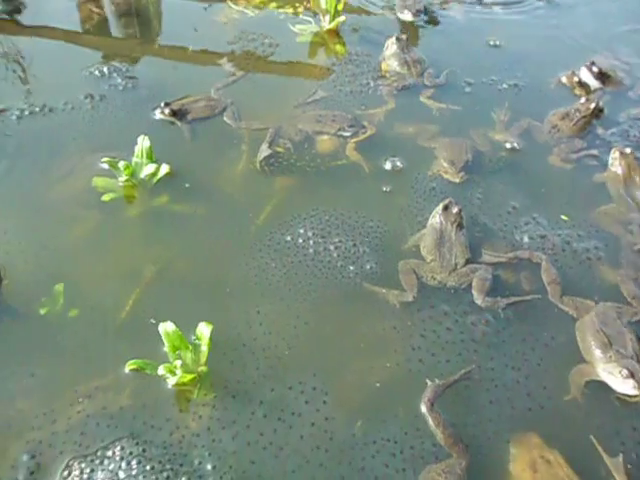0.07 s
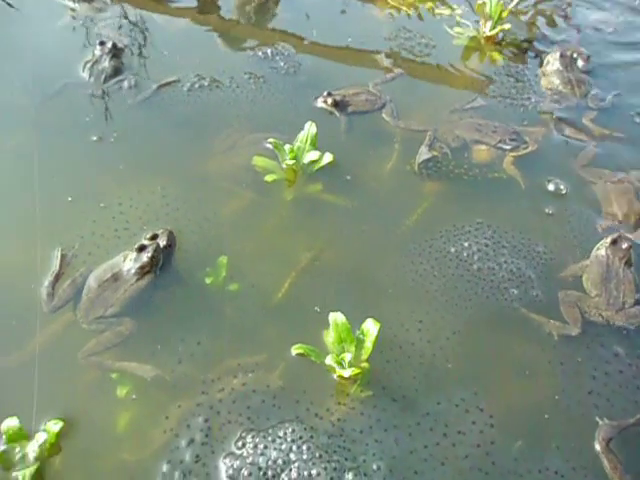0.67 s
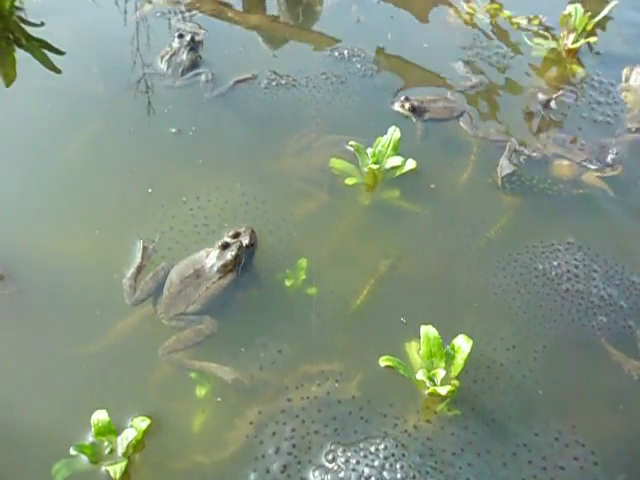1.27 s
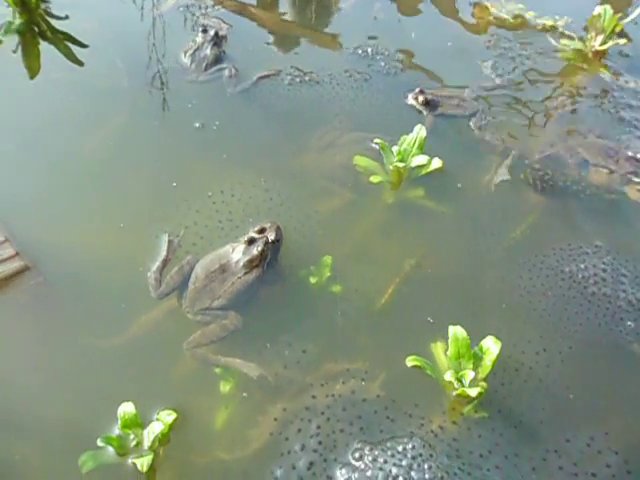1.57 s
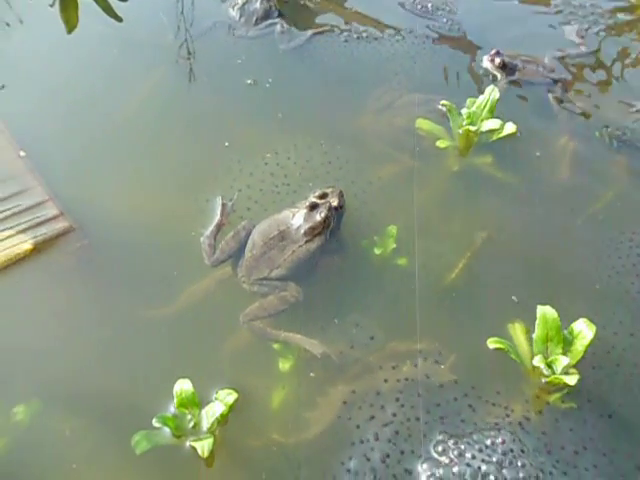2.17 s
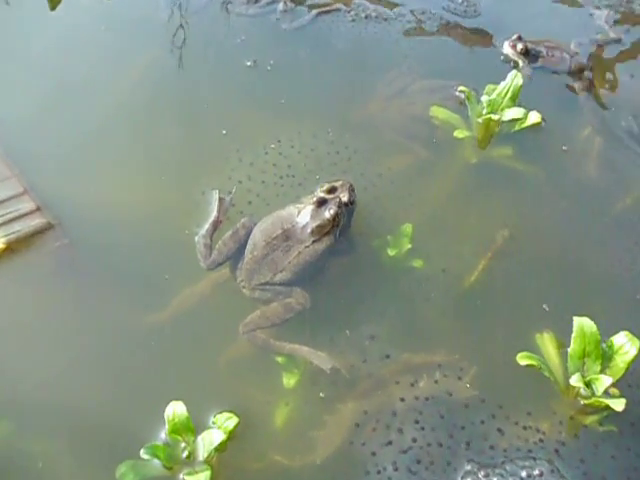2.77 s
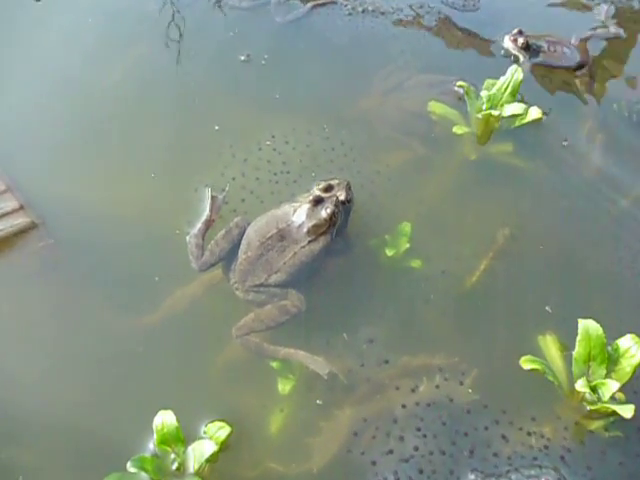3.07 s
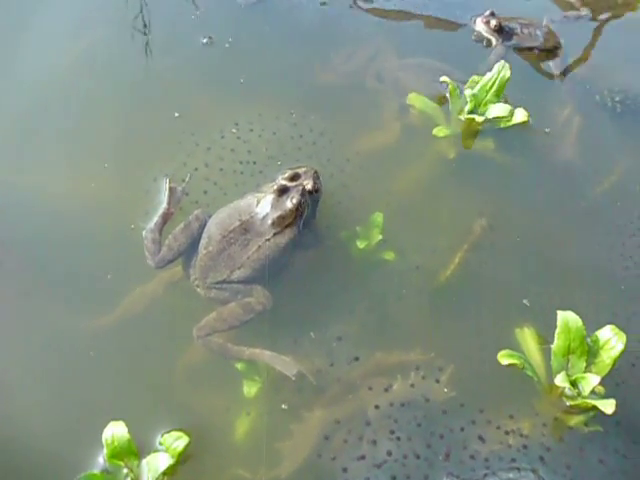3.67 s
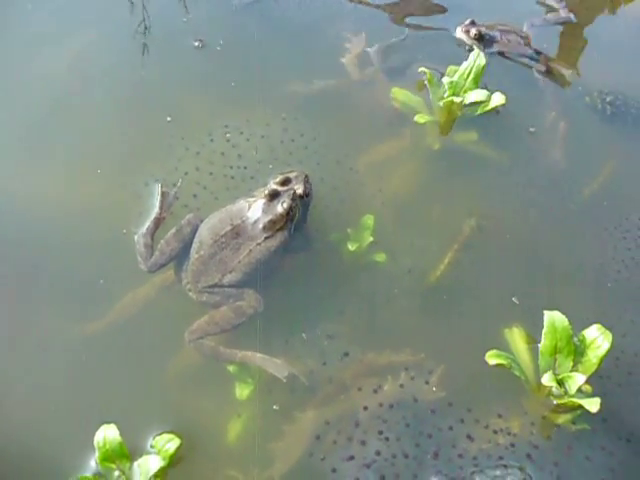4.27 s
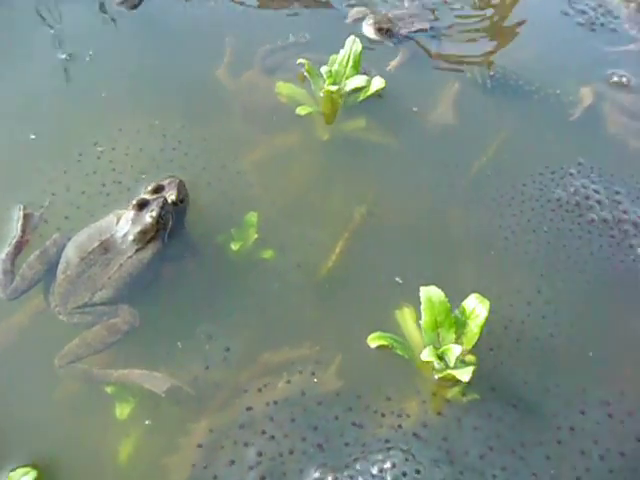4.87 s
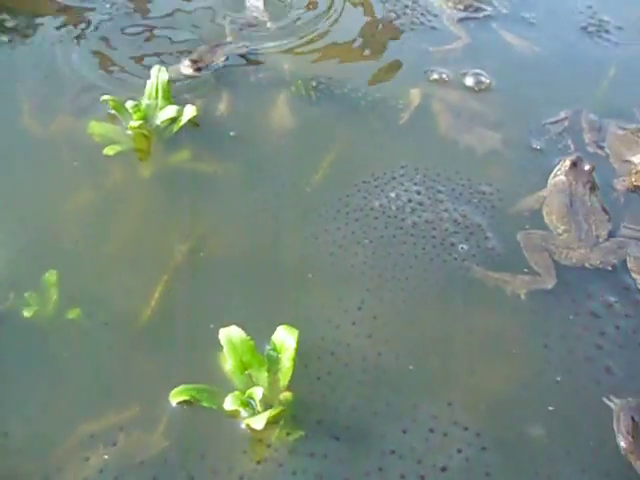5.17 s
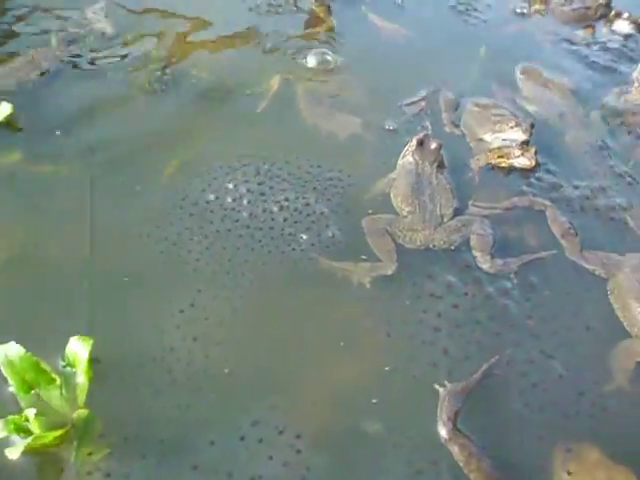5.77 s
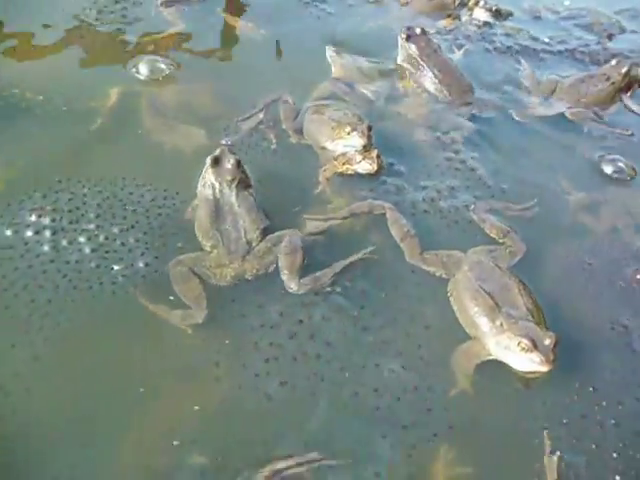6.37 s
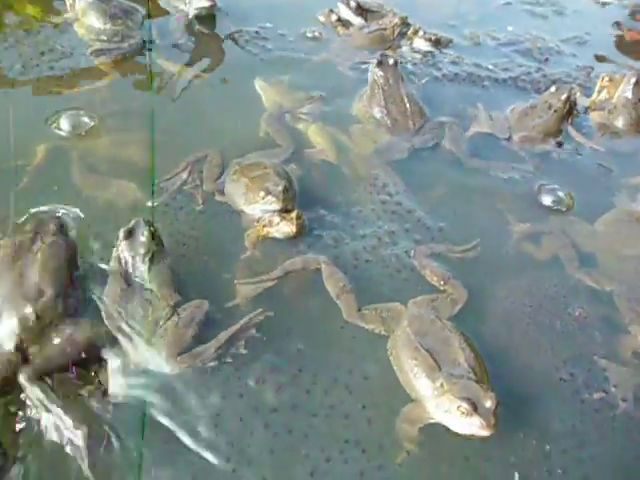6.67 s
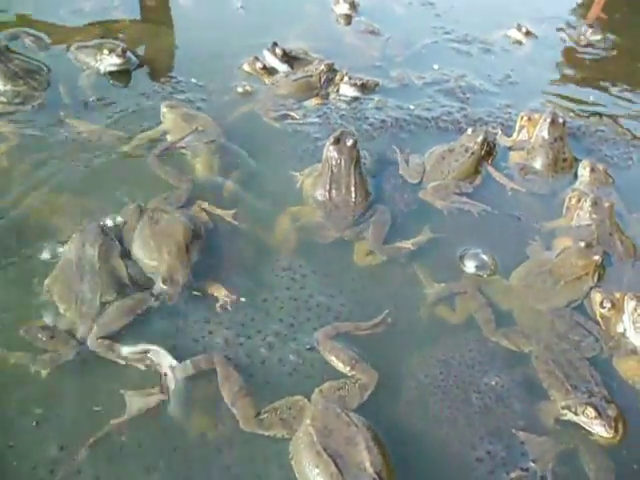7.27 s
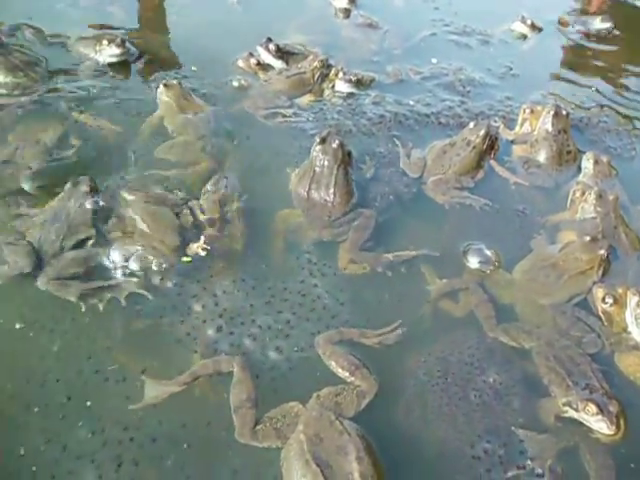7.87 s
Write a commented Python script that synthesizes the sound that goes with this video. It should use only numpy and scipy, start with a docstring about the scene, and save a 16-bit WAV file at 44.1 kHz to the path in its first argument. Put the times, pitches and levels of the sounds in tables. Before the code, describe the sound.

Purring, throaty croaks run almost without pause, picked up by a small camera microphone beside a garden pond. A dull knock on wood comes at the start, then a loud hollow one and two lesser ones around the middle. Toward the end the frogs move in the water with small splashes, drips and plinking bubbles. Behind them are a far frog chorus, soft hiss, faint bird whistles and, twice, a quiet zoom motor.

```python
"""A garden pond where common frogs purr: each croak is a train of pulses that ring the caller's throat sac.
Four hollow wooden knocks sound close by; swimming frogs slosh, splash and stir up bubbles.
Under it lie a far chorus, a faint bird, a low rumble, a swelling hiss
and, twice, the soft whirr of a zoom lens."""
import sys
import numpy as np
from scipy import signal
from scipy.fft import rfft, irfft
from scipy.io import wavfile

SR = 44100
rng = np.random.default_rng(int(sys.argv[2]) if len(sys.argv) > 2 else 0)


def store_pcm(level_fs):
    """Save levels as 16-bit WAV."""
    pcm = np.round(np.clip(level_fs, -1, 1) * 32767).astype(np.int16)
    wavfile.write(sys.argv[1], SR, np.atleast_2d(pcm).T)


N = 348831
TIME = np.arange(N) / SR


def from_db(db):
    """Decibels to gain."""
    return 10 ** (np.asarray(db) / 20)


def unit_rms(x):
    """Scale to unit power."""
    return x / np.sqrt(np.mean(x ** 2) + 1e-20)


def automation(points):
    """Join (time [s], value) breakpoints by straight lines."""
    return np.interp(TIME, *np.transpose(points))


def add(track, s, sound):
    """Mix a sound into the track at time s."""
    start = int(np.clip(round(s * SR), 0, N - 1))
    track[start:start + len(sound)] += sound[:N - start]


def shaped_noise(eq):
    """Unit-power noise through an EQ curve of (frequency [Hz], relative level [dB]) points."""
    hz, db = np.transpose(eq)
    bins = np.fft.rfftfreq(N, 1 / SR) + 1e-3
    gain = from_db(np.interp(np.log(bins), np.log(hz), db))
    return unit_rms(irfft(rfft(rng.normal(size=N)) * gain, N))


def filtered(x, hz, kind, order=2):
    """Causal Butterworth filter."""
    sos = signal.butter(order, np.clip(hz, 10, .45 * SR), kind, fs=SR, output="sos")
    return signal.sosfilt(sos, x)


def decay(t, t60):
    """Free decay, 60 dB down after t60 seconds."""
    return np.exp(-np.log(1000) * t / max(t60, 1e-4))


def ring(t, hz, t60):
    """One struck mode."""
    return np.sin(2 * np.pi * hz * t) * decay(t, t60)


def struck(t, modes, scale=1, spread_db=1):
    """Modes of alternating sign, each struck a little harder or softer by chance."""
    return sum((-1) ** k * from_db(db + spread_db * rng.normal()) * ring(t, hz * scale, t60)
               for k, (hz, db, t60) in enumerate(modes))


# tone of the outdoor air: (frequency [Hz], relative level [dB])
AIR_EQ = [(20, 1.5), (48, -3.5), (80, -11.5), (140, -14), (290, -29.5), (450, -27.5), (800, -29.5),
          (1800, -41), (3500, -44.5), (7000, -66.5)]
# fader ride on the low end, taken about its mean: (time [s], level [dB])
RUMBLE_RIDE = [(0.0, -52), (0.11, -54), (2.73, -51), (2.82, -58), (2.99, -43.5), (3.21, -52), (7.9, -54.5)]


def outdoor_air(level_db=-47, ride_depth=0.94, rumble_below_hz=110):
    """A dark bed of air whose low rumble rises and sinks."""
    air = from_db(level_db) * shaped_noise(AIR_EQ)
    ride_db = automation(RUMBLE_RIDE)
    rumble_gain = from_db(ride_depth * (ride_db - ride_db.mean()))
    return air + (rumble_gain - 1) * filtered(air, rumble_below_hz, "low", order=1)


# tone of the steady hiss and of its swells: (frequency [Hz], relative level [dB])
HISS_EQ = [(1500, -5.5), (2800, 0), (4500, 7), (7500, 2), (9000, -34)]
SWELL_EQ = [(1500, -12.5), (3000, -8.5), (4500, -2), (7400, -5), (9000, -20)]
# crests of the swells: (time [s])
SWELL_TIMES = [0.30, 0.90, 1.35, 2.40, 2.91, 3.469, 4.02, 4.68]


def hiss(steady_db=-70, swell_db=-62.5, swell_s=0.086):
    """A soft hiss that swells about twice a second early on, then lies still."""
    steady = from_db(steady_db) * shaped_noise(HISS_EQ)
    swells = sum(np.exp(-((TIME - s) / swell_s) ** 2) for s in SWELL_TIMES)
    return steady + from_db(swell_db) * swells * shaped_noise(SWELL_EQ)


# fader ride on the distant frogs: (time [s], level [dB])
CHORUS_RIDE = [(0.1, -53), (0.6, -61.5), (1.15, -67.5), (1.5, -51.5), (2.7, -51.5), (3.8, -63), (4.4, -50),
               (5.2, -59), (6.2, -61.5), (7.1, -56.5), (7.8, -69.5)]


def far_frogs(pulses_per_s=130, sac_hz=495, spread_db=4):
    """Many distant callers overlap into a dull, irregular patter."""
    out = np.zeros(N)
    for s in TIME[rng.random(N) < pulses_per_s / SR]:
        gain = from_db(spread_db * rng.normal())
        caller_hz = sac_hz * np.exp(0.13 * rng.normal())
        add(out, s, gain * croak_pulse(caller_hz, rasp_db=-19.5))
    return from_db(automation(CHORUS_RIDE)) * unit_rms(out)


# bird whistles: (time [s], length [s], start pitch [Hz], end pitch [Hz], level [dB])
CHIRPS = [(2.796, 0.11, 4240, 3380, -54), (3.125, 0.029, 5060, 4830, -59.5),
          (3.348, 0.021, 5300, 5160, -59.5), (3.761, 0.0378, 5080, 4700, -62),
          (3.883, 0.044, 5100, 4930, -63)]


def far_bird(blur=0.061):
    """Thin falling whistles, their pitch blurred by distance."""
    out = np.zeros(N)
    for s, length, start_hz, end_hz, db in CHIRPS:
        size = int(length * SR)
        jitter = unit_rms(filtered(rng.normal(size=size), 300, "low"))
        hz = np.linspace(start_hz, end_hz, size) * (1 + blur * jitter)
        whistle = np.sin(2 * np.pi * np.cumsum(hz) / SR)
        add(out, s, from_db(db) * np.hanning(size) ** .5 * whistle)
    return out


# runs of the lens motor: (start [s], end [s], level [dB])
ZOOMS = [(1.704, 2.624, -61.5), (4.85, 5.536, -64.5)]
# tone of its whirr: (frequency [Hz], relative level [dB])
WHIRR_EQ = [(1500, -8), (2900, -3.5), (3500, -16), (4250, 1), (4900, -5), (5600, -2), (7500, -13.5)]


def zoom_lens(ramp_s=0.083):
    """A tiny motor whirrs through the camera body."""
    running = sum(from_db(db) * np.clip(np.minimum(TIME - start, end - TIME) / ramp_s, 0, 1)
                  for start, end, db in ZOOMS)
    return running * shaped_noise(WHIRR_EQ)


def ripples(ticks_per_s=35, level_db=-55, rise_per_s=25):
    """Small bubbles all over the pond ring as faint rising ticks."""
    out, t = np.zeros(N), TIME[:SR // 50]
    for s in TIME[rng.random(N) < ticks_per_s / SR]:
        gain = from_db(level_db + 2 * rng.normal())
        add(out, s, gain * ring(t * (1 + rise_per_s * t), hz=rng.uniform(2000, 7000), t60=.004))
    return out


# tiny bubbles bursting: (time [s], level before trim [dB])
BURSTS = [(3.1817, -46.5), (3.2415, -47), (5.676, -47), (5.7748, -49), (6.4817, -39), (6.7386, -41),
          (7.1821, -45.5), (7.8012, -42)]


def bursting_bubbles(trim_db=-1.5, t60=.012, low_cut_hz=2800):
    """A bubble film breaks: a brief bright click with no pitch."""
    out, t = np.zeros(N), TIME[:SR // 40]
    for s, db in BURSTS:
        click = rng.normal(size=len(t)) * decay(t, t60)
        add(out, s, from_db(db + trim_db) * filtered(click, low_cut_hz, "high"))
    return out


def churn(strokes, low_hz, high_hz, bubbles_per_s, cycles, tail_s, tilt_db):
    """Each stroke breaks the surface into many bubbles of random size, each ringing for a few cycles."""
    out, t = np.zeros(N), TIME[:SR // 5]
    for s, length, db in strokes:
        cloud = np.zeros(len(t))
        for onset, pitch, strength in rng.random((int(bubbles_per_s * t[-1]), 3)):
            start = int(onset * len(t))
            hz = low_hz * (high_hz / low_hz) ** pitch
            age = t[:min(int(SR * cycles / hz), len(t) - start)]
            gain = from_db(10 * strength + tilt_db * pitch)
            cloud[start:start + len(age)] += gain * ring(age, hz, cycles / hz)
        attack = 1 - np.exp(-4 * t / length)
        release = np.exp(-np.maximum(t - length, 0) / tail_s)
        add(out, s, from_db(db) * attack * release * unit_rms(cloud))
    return out


# swimming strokes: (time [s], length [s], level [dB])
SLOSHES = [(5.865, 0.019, -38.5), (6.805, 0.11, -47.5), (6.920, 0.06, -47), (7.420, 0.047, -45)]


def slosh():
    """A swimming frog shoves water aside, and large bubbles ring low."""
    return churn(SLOSHES, low_hz=99, high_hz=1370, bubbles_per_s=1100,
                 cycles=18, tail_s=0.022, tilt_db=0.5)


# kicks at the surface: (time [s], length [s], level [dB])
KICKS = [(0.911, 0.0064, -55.5), (5.952, 0.025, -44.5), (6.773, 0.0039, -41.5), (6.815, .014, -50.5),
         (6.945, 0.0059, -49), (7.057, .014, -48.5), (7.095, 0.025, -48), (7.677, .013, -52)]


def splashes(fall_delay_s=.044, fall_db=-9, drops_db=-12.5):
    """A kick throws bright spray, which falls back more softly while stray drops patter down."""
    falls = [(s + fall_delay_s, length, db + fall_db) for s, length, db in KICKS]
    spray = churn(list(KICKS) + falls, low_hz=1240, high_hz=8730, bubbles_per_s=3000,
                  cycles=28, tail_s=0.0078, tilt_db=30.5)
    drops = churn(KICKS, low_hz=2550, high_hz=7300, bubbles_per_s=70, cycles=15, tail_s=0.07, tilt_db=0)
    return spray + from_db(drops_db) * drops


# bubble trails behind a moving frog: (start [s], end [s], bubbles [count],
# start level [dB], end level [dB], start pitch [Hz], end pitch [Hz])
TRAILS = [ (0.231, 0.292, 3, -46, -43.5, 3100, 3560), (5.361, 5.412, 5, -39, -40, 2400, 2800),
          (5.430, 5.455, 3, -43, -42, 1920, 2350), (6.766, 6.827, 4, -31.5, -40.5, 3020, 1680),
          (6.958, 6.998, 3, -49.5, -28, 2170, 2760), (7.528, 7.597, 6, -42, -42, 1100, 2580), ]
# single drips: (time [s], level [dB], pitch [Hz])
DRIPS = [(2.498, -38, 6800), (2.806, -38.5, 4100), (3.312, -46.5, 3250), (5.967, -34, 2880),
         (6.702, -29, 6100), (6.781, -31, 4730), (6.933, -37.5, 6700), (7.684, -40.5, 4790)]


def bubbles(rise_per_s=7.2, cycles=45.4, snap_db=-9, pitch_scatter=0.061):
    """A bubble pinches off with a snap and rings, rising in pitch; size and level drift along a trail."""
    out, t = np.zeros(N), TIME[:SR // 25]
    trail_bubbles = []
    for start, end, count, start_db, end_db, start_hz, end_hz in TRAILS:
        trail = np.linspace((start, start_db, start_hz), (end, end_db, end_hz), int(round(count)))
        trail_bubbles += [(s, db, hz * np.exp(pitch_scatter * rng.normal())) for s, db, hz in trail]
    for s, db, hz in trail_bubbles + list(DRIPS):
        snap = from_db(snap_db) * rng.normal(size=len(t)) * decay(t, t60=0.0013)
        plink = ring(t * (1 + rise_per_s * t), hz, t60=cycles / hz)
        add(out, s, from_db(db) * (plink + snap))
    return out


def fizz(relative_db=-23):
    """Finer bubbles sparkle around each trail, tucked under its mean level."""
    strokes = [(start, end - start, (start_db + end_db) / 2 + relative_db)
               for start, end, _, start_db, end_db, *_ in TRAILS]
    return churn(strokes, low_hz=1250, high_hz=3580, bubbles_per_s=290,
                 cycles=4.7, tail_s=0.028, tilt_db=7.5)


# modes of the hollow wood: (frequency [Hz], relative level [dB], t60 [s])
WOOD_MODES = [(137, -15, 0.4), (171.2, -9, 0.055), (242.2, -15, 0.15), (272, -11, 0.17), (305, -12, 0.037),
              (366.4, -9.5, 0.16), (404, -15, 0.24), (458.4, -7.5, 0.12), (530.4, -7.5, 0.11),
              (604, -3, 0.054), (713, -6.5, 0.1), (807, -8, 0.046), (922, 1, 0.043), (1131, -12, 0.11),
              (1218, -12, 0.094), (1446, -14, 0.043), (1590, -17.5, 0.038), (2057, -17.5, .05)]
# the garden's reverb in octave bands: (centre [Hz], relative level [dB], t60 [s])
GARDEN_REVERB = [(250, -18.5, 0.45), (517, -11.5, 0.25), (910, -22.5, 0.35), (1890, -25, 0.2),
                 (4173, -26.5, 0.2)]
# blows on the wood, two close pairs heard as one knock each: (time [s], body level [dB],
# body high cut [Hz], boom boost [dB], clack level [dB], clack pitch [Hz], crack level [dB])
KNOCKS = [ (0.360, -20.5, 650, 6.5, -41, 790, -42.5), (2.950, -17.5, 2000, -16, -17.5, 1480, -31),
          (2.9553, -8, 2200, -2, -2, 1108, -29.5), (3.530, -22.5, 1100, 2.5, -30, 925, -47),
          (3.547, -15, 1240, -1.5, -12.5, 969, -33.5), (4.733, -23, 840, -2.5, -27, 940, -48), ]


def wooden_knocks(clack_rise_s=.0026, crack_t60=0.044, boom_below_hz=340, reverb_rise_s=0.017):
    """Each blow gives a crack, a clack at the contact, the ring and boom of wood and a diffuse tail."""
    out, t = np.zeros(N), TIME[:SR // 2]
    for s, body_db, high_cut_hz, boom_db, clack_db, clack_hz, crack_db in KNOCKS:
        # a heavy blow drives the lowest modes harder
        wood = struck(t, [(hz, db + boom_db * (hz < boom_below_hz), t60) for hz, db, t60 in WOOD_MODES])
        reverb = np.zeros(len(t))
        for hz, db, t60 in GARDEN_REVERB:
            octave = filtered(rng.normal(size=len(t)), [hz / 2 ** .5, hz * 2 ** .5], "band")
            reverb += from_db(db) * decay(t, t60) * unit_rms(octave)
        reverb *= 1 - np.exp(-t / reverb_rise_s)
        body = filtered(wood + reverb, high_cut_hz, "low")
        clack = np.sin(2 * np.pi * clack_hz * t) * t / clack_rise_s * np.exp(1 - t / clack_rise_s)
        bright_noise = filtered(rng.normal(size=len(t)), [1200, 3600], "band", order=1)
        crack = unit_rms(bright_noise) * decay(t, crack_t60)
        add(out, s, from_db(body_db) * body + from_db(clack_db) * clack + from_db(crack_db) * crack)
    return out


# throat sac, its main mode paired with a faster-dying one close by:
# (frequency [multiple of the sac pitch], relative level [dB], t60 [s])
SAC_MODES = [(0.745, -18.5, 0.019), (1.0, 0, 0.017), (0.98, 4, 0.009)]
# the throaty edge of a pulse: (frequency [Hz], relative level [dB], t60 [s])
RASP_MODES = [(810, -3, 0.0098), (1290, -17, 0.0071), (1827, -19, .009), (2330, -25.5, 0.0054)]


def croak_pulse(sac_hz, rasp_db, swell_s=0.001, snap_s=0.0002, tension=0.91, relax_s=0.0013):
    """The larynx snaps open once: a short rasp, and the sac swells into a few cycles of ringing."""
    t = TIME[:SR // 32]
    pitch_hz = sac_hz * (1 + 0.029 * rng.normal())
    # the puff stretches the sac, so its pitch starts high and sinks
    warped_t = t + tension * relax_s * (1 - np.exp(-t / relax_s))
    sac = struck(warped_t, SAC_MODES, pitch_hz, spread_db=0.75) * (1 - np.exp(-t / swell_s))
    rasp = sum(from_db(db) * ring(t, hz, t60) for hz, db, t60 in RASP_MODES) * (1 - np.exp(-t / snap_s))
    return sac / np.abs(sac).max() - from_db(rasp_db) * rasp


def pulse_train(start, end, count, quickening, peak_db, swell_db, fade_db):
    """Pulse times and levels of one croak: the gap changes steadily while the level draws one arch."""
    progress = np.linspace(0, 1, int(round(count)))
    times = start + (end - start) * (progress + quickening / 2 * progress * (1 - progress))
    from_peak = np.sqrt(abs(swell_db)) * (1 - progress) - np.sqrt(abs(fade_db)) * progress
    return zip(times, peak_db - from_peak ** 2)


# croaks: (start [s], end [s], pulses [count], quickening [share of the pulse gap], peak level [dB],
# swell depth [dB, sign ignored], fade depth [dB, sign ignored], sac pitch [Hz], rasp [dB])
CROAKS = [ (0.0066, 0.173, 5, .19, -31, 4, 4, 600, 2), (0.038, 0.31, 11, 0.077, -31, 0.5, -1, 506, 4),
          (0.3315, 1.043, 14, -0.024, -35.5, 1.5, 1, 492, -7),
          (1.176, 1.719, 18, 0.069, -33, 11.5, 0.5, 504, 3.5),
          (1.376, 1.458, 3, -0.099, -37, 0, 0, 440, -4),
          (1.7616, 2.4744, 14, -0.14, -35.5, 1.5, 5, 470, 0.5),
          (1.793, 2.144, 9, 0.011, -38.5, -0.5, 17, 507, -2), (2.519, 2.745, 8, -.05, -40.5, 0, 3, 565, 0),
          (2.774, 2.918, 6, -0.21, -34, -0.7, 5, 486, -2.5),
          (3.0813, 3.513, 17, .506, -34.5, 5, .5, 607, -18),
          (4.0188, 4.544, 22, 0.19, -32, 4, 4.5, 565, 4.5), (4.223, 4.528, 5, 0, -41, 0.5, -2, 446, -1.5),
          (4.565, 4.943, 16, 0.15, -31, 5.5, 1, 571, 3.5),
          (4.957, 5.504, 13, -.197, -31.5, 1.5, -0.5, 541, 0),
          (5.061, 5.877, 14, 0.03, -34, -1, 2.5, 466, -1),
          (5.291, 5.465, 5, -0.069, -30, 6.5, 1, 650, -0.5),
          (5.554, 5.941, 10, .067, -30, 1, 1.2, 536, -0.5),
          (5.983, 6.457, 12, 0.077, -28.5, 3, 4.5, 543, 0), (6.298, 6.416, 4, 0, -27, 7, 2, 524, 1.5),
          (6.441, 6.673, 7, -0.085, -24, 4.5, -1, 558, -7),
          (7.144, 7.255, 4, -0.0065, -43, .1, 4.5, 458, -10), ]
# lone pulses: (time [s], level [dB], sac pitch [Hz], rasp [dB])
GRUNTS = [(4.781, -30, 410, -2), (5.015, -36, 520, 4), (6.353, -37, 505, -4), (6.712, -32, 543, 8)]


def near_frogs(full_voice_db=-33, softening=0.3, uneven_db=0.15):
    """Frogs close by pulse their throat sacs in croaks and lone grunts; soft pulses rasp less."""
    out = np.zeros(N)
    pulses = [(s, db, sac_hz, rasp_db)
              for *phrasing, sac_hz, rasp_db in CROAKS for s, db in pulse_train(*phrasing)]
    for s, db, sac_hz, rasp_db in pulses + list(GRUNTS):
        softened_db = rasp_db + softening * min(db - full_voice_db, 0)
        add(out, s, from_db(db + uneven_db * rng.normal()) * croak_pulse(sac_hz, softened_db))
    return out


def bank_echoes(x, level_db=-15, t60=0.026, echoes_per_s=900, predelay_s=.004):
    """Banks and fence add a thin scatter of early echoes to the direct sound."""
    t = TIME[:SR // 6]
    echoes = rng.normal(size=len(t)) * (rng.random(len(t)) < echoes_per_s / SR)
    echoes *= (t > predelay_s) * decay(t, t60)
    return x + from_db(level_db) * signal.fftconvolve(x, echoes / np.linalg.norm(echoes))[:N]


def scene():
    """Mono mix: the background bed, the knocks, and the water and frogs with their early echoes."""
    bed = outdoor_air() + hiss() + far_frogs() + far_bird() + zoom_lens()
    water = ripples() + bursting_bubbles() + slosh() + splashes() + bubbles() + fizz()
    return (bed + wooden_knocks() + bank_echoes(water + near_frogs()))[None]


def record(dry, high_cut_hz=7850):
    """A small camera microphone: full scale limits the peaks, and the top is cut steeply."""
    high_cut = signal.ellip(10, .2, 70, high_cut_hz, fs=SR, output="sos")
    return signal.sosfilt(high_cut, np.clip(dry, -1, 1))


dry = scene()
out = record(dry)
store_pcm(out)
```